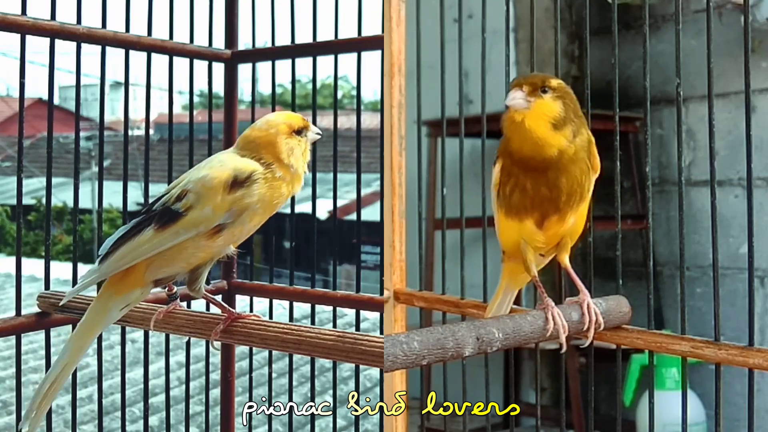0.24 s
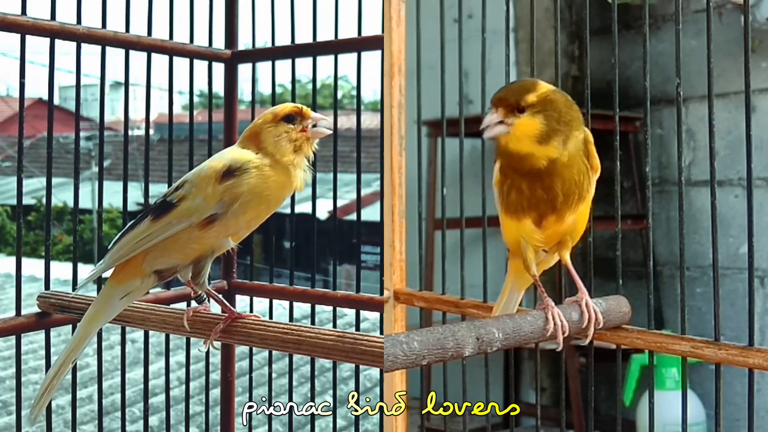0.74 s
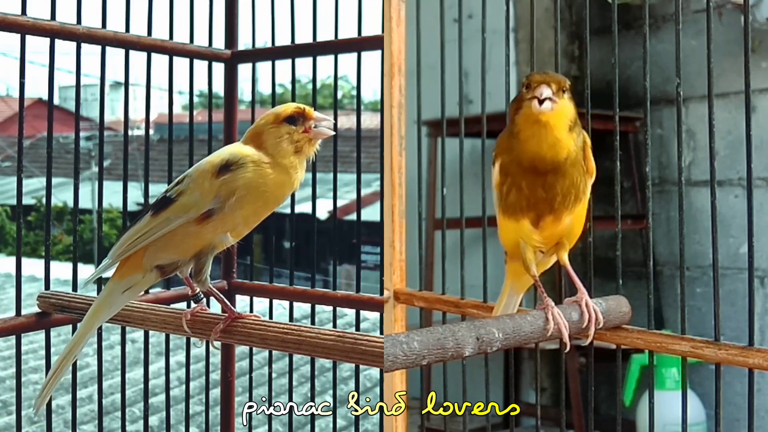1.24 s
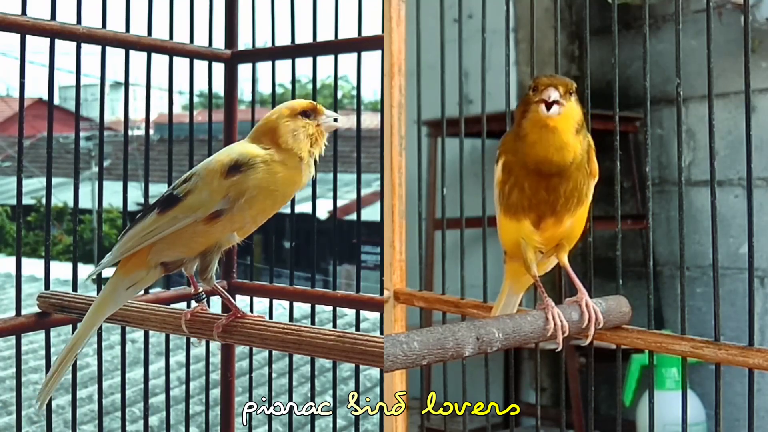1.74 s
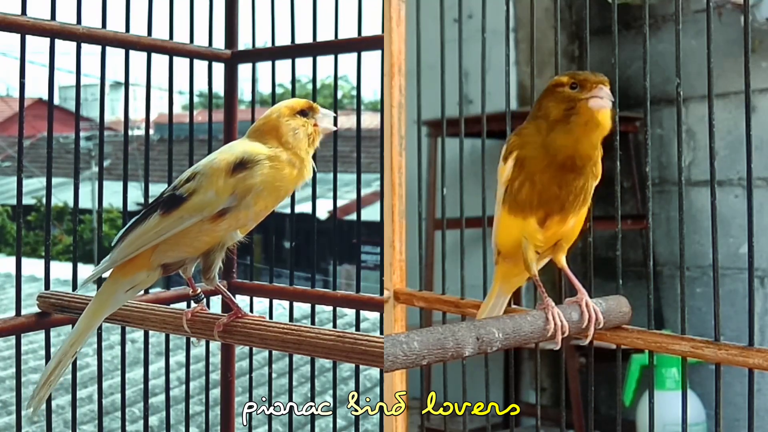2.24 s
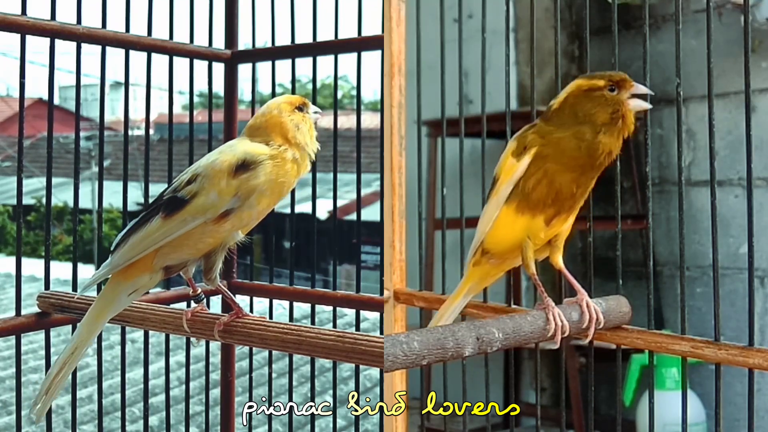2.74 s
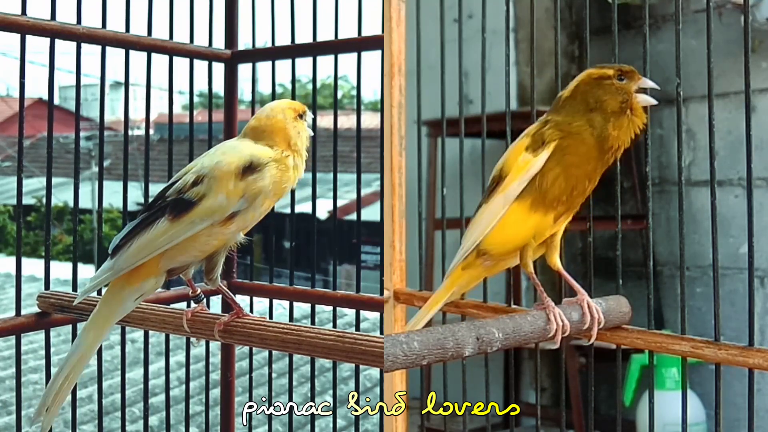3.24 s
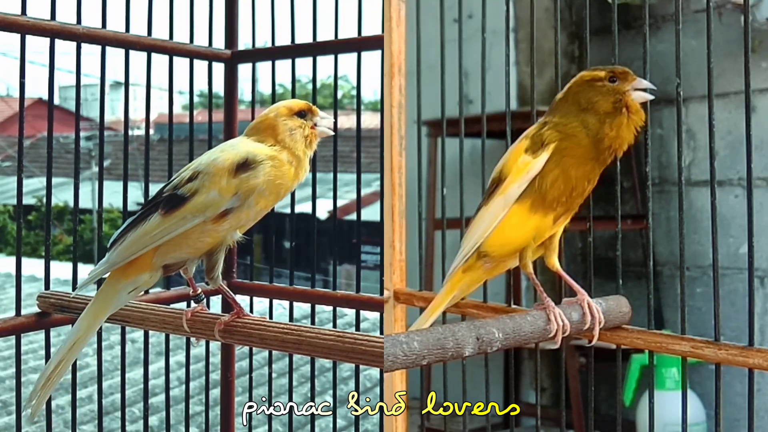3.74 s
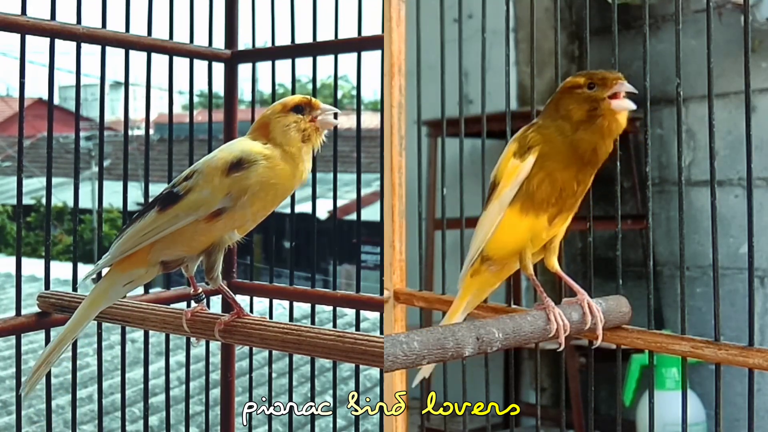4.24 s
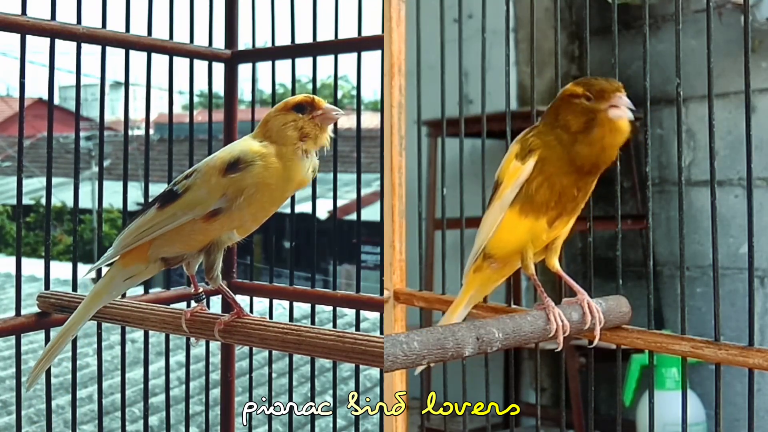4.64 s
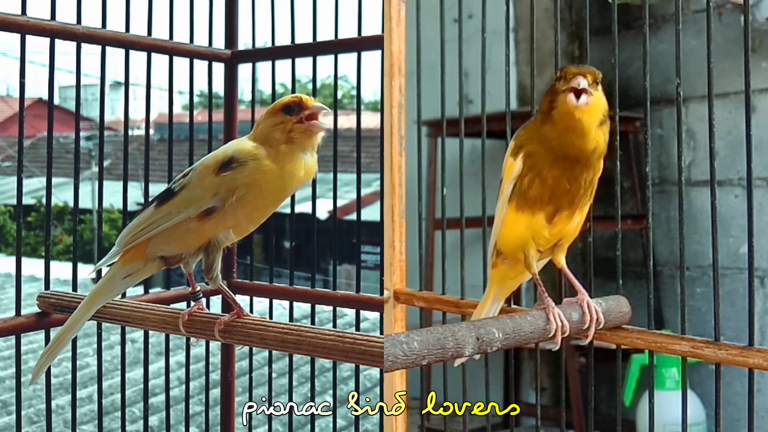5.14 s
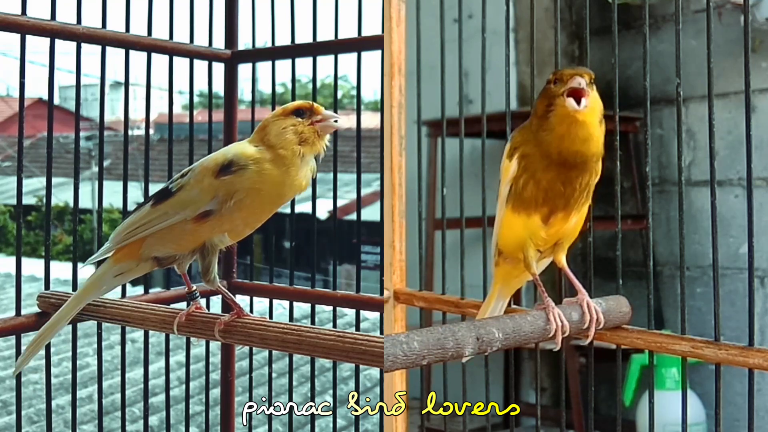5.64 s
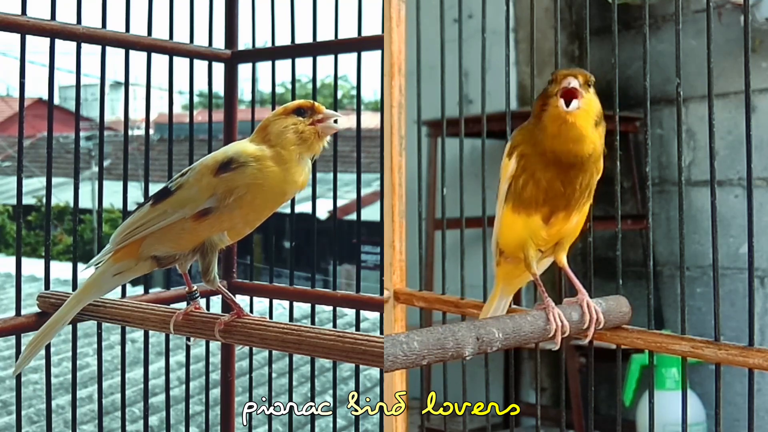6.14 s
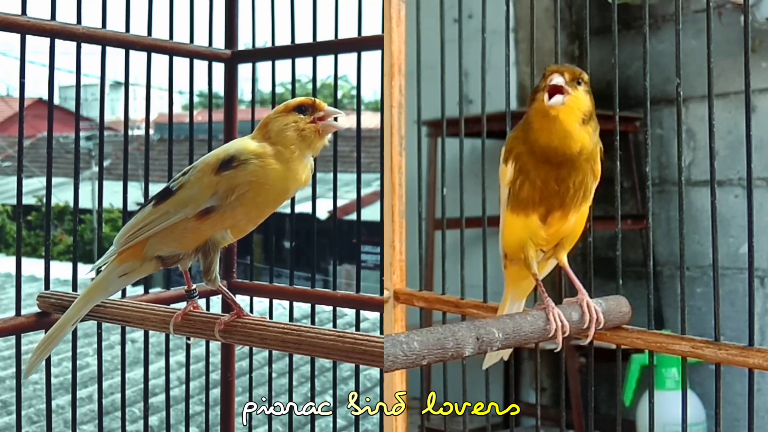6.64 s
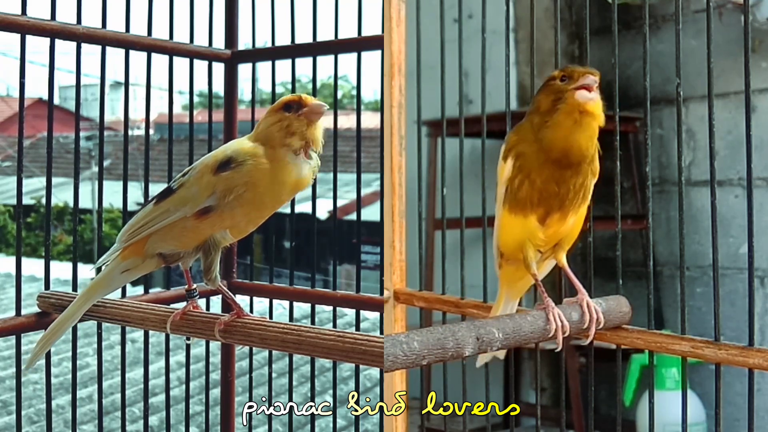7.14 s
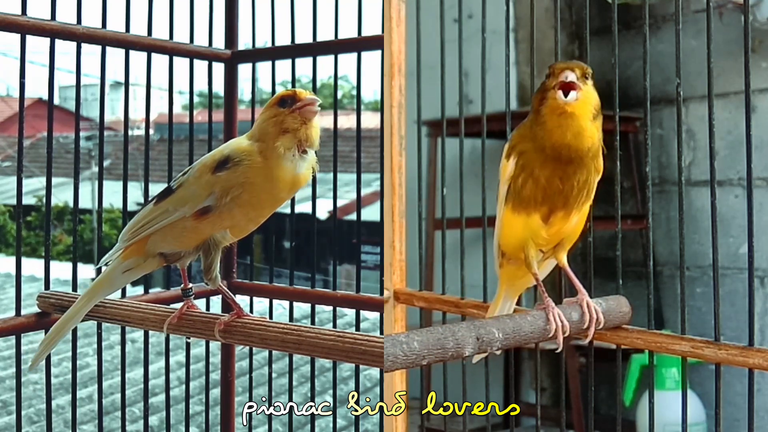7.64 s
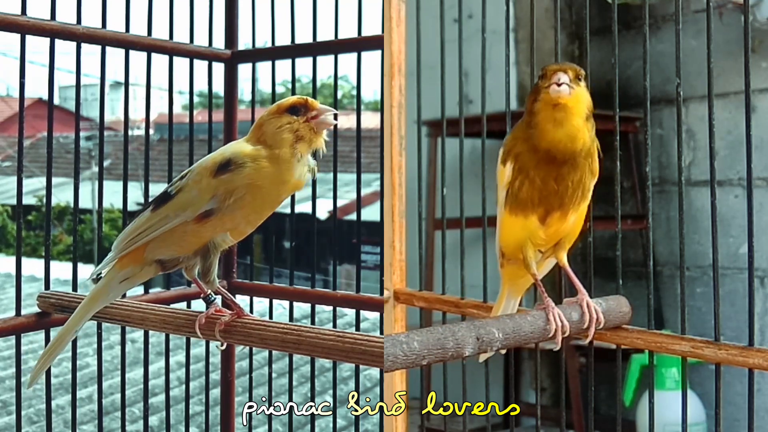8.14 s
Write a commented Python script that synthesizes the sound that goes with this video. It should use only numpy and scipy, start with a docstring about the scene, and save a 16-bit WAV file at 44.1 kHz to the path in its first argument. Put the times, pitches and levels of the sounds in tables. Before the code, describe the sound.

Bright, piercing duet of two canaries, quick ticks, swooping whistles and buzzy trills, with low wind buffeting and a faint distant engine.

```python
"""A roof terrace: two caged canaries sing against each other, repeating whistled sweeps, held notes and trills.
Each bird is a near sine steered by pitch and level tracks, with faint overtones and breath hiss.
Near walls blur the song in a short noise tail and a far wall returns the second bird late. Wind buffets the
microphone as lumpy low noise, a small engine drones far off as two wavering sines, soft distant knocks are
low noise bursts, and filtered noise makes the outdoor hum."""
import sys
import numpy as np
from scipy import signal
from scipy.fft import rfft, irfft
from scipy.io import wavfile
from scipy.ndimage import uniform_filter1d

SR = 44100
rng = np.random.default_rng(int(sys.argv[2]) if len(sys.argv) > 2 else 0)


def unload_audio(sound):
    """Save the sound as a 16-bit wav file, at the path given as the first command line argument."""
    columns = np.transpose(np.atleast_2d(sound))
    # keep every value between -1 and 1, then stretch to whole-number steps
    steps = np.round(np.clip(columns, -1, 1) * 32767)
    wavfile.write(sys.argv[1], SR, steps.astype(np.int16))


N = 369999

# All levels are mix levels, ahead of the output gain in record().
# Opening glides shared by the arched syllables of the first bird: flick up, steep fall, break
# [length/ms, start f/Hz, end f/Hz, bend, onset level/dB, body level/dB, ending level/dB]
ARCH_TOP = [(11.17, 5400, 7650, 4.0, -16, 2, 10.5), (19.3, None, 7200, .6, 4, 4.5, 3),
            (54.9, None, 4400, 1.35, 2.5, 1.5, 1.5), (25.7, 4200, 3800, .8, 2, -1.5, 1)]
# Song: each syllable has a chain of glides and the phrases that use it.
# Glides: [length/ms, start f/Hz, end f/Hz, bend, onset level/dB, body level/dB, ending level/dB]
# Phrases: [t/s, length/s, level/dB before throat colour]; a count spreads that many notes through the rows.
FIRST_SYLLABLES = { "fall": ([(10.5, 7800, 7500, 0.6, 3, 6.2, 3.5), (15, None, 6000, 1.1, 11.6, 0.57, 0.36),
                   (None, None, 1900, 0.82, 0.48, 3, 1)], [dict(count=13, notes=[(.4677, 0.072, -22),
                   (.7719, 0.074, -22), (1.0781, 0.07, -22.5), (1.3878, .0804, -21.5),
                   (1.7099, 0.07, -24)])]), "hooked tick": ([(5, 2798.5, 3351, 1.5, -3, 13, -5),
                   (None, 3050, 1300, 1.1, 0, 0, -31)], [dict(count=9, notes=[(.198, .015, -33),
                   (.372, .015, -29)])]), "quick fall": ([(6, 7799, 7398.5, 1.07, 25, 1, 1),
                   (23, None, 4400, 0.95, -12.5, 1, -1.9), (None, None, 2100, 0.88, 0, 1.53, -11.5)],
                   [dict(notes=[(.383, 0.059, -21)]), dict(count=17, notes=[(1.7985, 0.047, -20),
                   (2.0955, 0.05, -19.5), (2.4023, 0.056, -20.5), (2.7252, .0506, -19.5),
                   (3.0411, 0.057, -20)])]), "long fall": ([(10, 7700, 7550, 1.5, 7, -3.5, 0),
                   (None, None, 2200, .6, -1.6, 0.4, -7)], [dict(notes=[(3.274, .183, -17),
                   (3.489, 0.187, -17), (3.709, 0.2, -16.5), (3.9405, 0.146, -17.5)])]),
                   "straight fall": ([(None, 7700, 2300, .76, 2, 0.4, -7)],
                   [dict(notes=[(3.1205, 0.12, -16.5), (5.221, 0.14, -17)])]),
                   "bent fall": ([(7.5, 7401, 7309, 0, 2, -0.5, -11),
                   (50, None, 4900, 1.3, -7.5, -1.5, -3.3), (None, None, 2100, 0.83, 0, 3.6, -15.5)],
                   [dict(count=6, notes=[(4.1225, .13, -21.5), (4.9135, 0.13, -19)]),
                   dict(notes=[(5.0635, .135, -19.5)])]),
                   "fall and hold": ([(29, 7606, 7079, 0.76, -12, -2.5, 3),
                   (32, None, 6850, 0.79, 4, 3.5, 0), (104, None, 4100, 1.02, 1.5, -1, -1.1),
                   (None, None, 4020, 8.6, -.7, .2, .2)], [dict(notes=[(5.4025, .252, -16)])]),
                   "arch": (ARCH_TOP + [(None, None, 2520, 1.6, 2.5, 2.2, .6)],
                   [dict(notes=[(5.748, .19, -18.5), (5.977, 0.19, -18), (6.2115, 0.19, -20),
                   (7.5945, 0.19, -20.5), (7.8575, 0.1921, -18), (8.101, 0.206, -20),
                   (8.357, 0.18, -15.5)])]),
                   "long arch": (ARCH_TOP + [(None, None, 2150, 1.5, 1.5, -1.5, -8)],
                   [dict(notes=[(6.4515, 0.23, -17), (6.716, 0.24, -17.5), (7.015, 0.24, -16.5),
                   (7.309, 0.24, -17.5)])]), }
SECOND_SYLLABLES = { "tick": ([(7, 7100.5, 5500, 1.5, -18, -8.5, -19),
                    (5.02, None, 3900, 1.1, -15, -1.1, 4.6), (None, None, 3300, 0.98, -2, -12.5, -10)],
                    [dict(count=10, notes=[(.0145, .017, -14.5), (.1565, .017, -14),
                    (.304, .017, -16.5)])]), "flick": ([(13, 7299, 5000, 1.8, -15, -11, 12),
                    (None, 4400, 2850, 1.1, -22, -4.5, -11.5)], [dict(count=9, notes=[(.4287, 0.025, -8),
                    (.6319, 0.029, -7), (.8344, .028, -6.5)])]),
                    "deep flick": ([(25, 6949.5, 4198, 1.46, 13, -2.5, -12),
                    (None, 3600, 1630, .9, 0, 1.43, 3)], [dict(count=11, notes=[(4.1633, 0.045, -16.5),
                    (4.4814, 0.045, -15.5), (4.8113, .0412, -15.5)])]),
                    "plunge": ([(53, 6900, 4450, 1.35, -6, 4.2, 0), (None, 4250, 1400, .85, 1.6, 7.9, 1.9)],
                    [dict(count=10, notes=[(.885, 0.082, -20), (1.19, 0.077, -19.5), (1.491, .08, -19.5),
                    (1.799, 0.081, -19)])]), "fall": ([(58, 6800, 3750, 1.3, 0.83, 1.23, 1.5),
                    (None, 3450, 1300, .6, 1.7, 7.6, 9.2)], [dict(count=6, notes=[(1.91, .094, -17.5),
                    (2.49, 0.092, -17)]), dict(count=5, notes=[(4.8762, 0.098, -17.5),
                    (5.3522, 0.093, -16.5)])]), "stepped fall": ([(51.5, 6900, 5900, 1.35, 5.5, -0.5, -1.5),
                    (19, None, 5550, 0.94, -0.5, -1.1, 0), (None, 5150, 1100, 0.42, 6.4, 1.5, 3)],
                    [dict(notes=[(5.474, .143, -17)]), dict(count=4, notes=[(5.65, 0.14, -15),
                    (6.171, .143, -16)])]), "high note": ([(5, 4302, 5500.5, 1.5, -18, -8, -7),
                    (None, None, 5650, 3.01, -1.2, -10, -13)], [dict(notes=[(2.796, 0.0559, -9.5),
                    (3.031, .063, -12)])]), "pip": ([(None, 4500, 5900, 7.04, -3, 0, -13)],
                    [dict(notes=[(2.608, 0.026, -14)])]),
                    "low note": ([(None, 2701, 2660, 1.094, -3.5, 0, -22)], [dict(notes=[(2.643, 0.13, -9),
                    (2.858, 0.14, -7.5), (3.093, 0.162, -9)])]),
                    "rise": ([(26, 2052.5, 3951, 2.3, -30, 6, 2), (7, None, 4950, 1.5, 0.55, -12, -6),
                    (47, None, 6800, .75, -1.5, 0, 0), (None, 7000, 7100, 0.98, -15, -16, -22)],
                    [dict(notes=[(6.511, 0.095, -15), (6.624, 0.093, -14.5)]),
                    dict(count=6, notes=[(6.735, .09, -16), (7.260, .09, -15.5)])]),
                    "scoop": ([(None, 1300, 3261, 2.1, -20, .6, -2.8)], [dict(notes=[(7.578, .06, -12),
                    (7.838, .06, -12.5)])]), "flip": ([(None, 1500, 3500, 7.4, -20.5, 1.5, -9)],
                    [dict(notes=[(7.363, .035, -11)])]), "held note": ([(36, 3998, 4569, 1, -4, 0.5, -14),
                    (None, None, 4670, 2.1, -.6, -0.26, -.2)], [dict(notes=[(7.4, 0.143, -12.5),
                    (7.64, 0.148, -12), (7.9, .173, -11)])]),
                    "high held note": ([(21.5, 4012, 4201, 3, -14, 4, 5),
                    (None, 4600, 5600, 4.4, 5.4, -0.49, 1.6)], [dict(notes=[(6.347, .141, -16)])]),
                    "hook": ([(8.5, 5208, 6848, 2.5, -4, -8, 3), (81.5, None, 3400, 1.4, -8, -6, -2.2),
                    (None, 3150, 2380, 1.6, -9, -3, -2)], [dict(notes=[(8.1185, .17, -8),
                    (8.329, 0.18, -10)])]), }
# Trills of short sweeps, each with a note count and a bend: [t/s, length/s, start f/Hz, end f/Hz, level/dB]
FIRST_TRILLS = [dict(count=3, bend=0.92, notes=[(.141, 0.01, 2501, 1203, -41),
                (.183, .011, 2697, 1299, -37)])]
SECOND_TRILLS = [ dict(count=9, bend=0.83, notes=[(3.272, 0.006, 3300, 2350, -14),
                 (3.340, 0.006, 5300, 2950, -12.5), (3.415, 0.0062, 5900, 3200, -14)]),
                 dict(count=15, bend=0.93, notes=[(3.434, 0.007, 6850, 4500, -13),
                 (3.5715, 0.0066, 6800, 4500, -13), (3.713, 0.0064, 6850, 4500, -13)]),
                 dict(count=15, bend=2.5, notes=[(3.768, 0.02, 2000, 4050, -17),
                 (3.927, 0.018, 2050, 4150, -16), (4.090, 0.02, 2114, 4200, -18)]),
                 dict(count=1, bend=2.9, notes=[(3.741, 0.022, 2300, 3850, -10.5)]), ]
# How strongly throat, beak and perch position pass each pitch: [f/Hz, level/dB]
FIRST_THROAT = [(2300, 0.5), (2650, 5.5), (3250, 4.5), (3650, 4.5), (4150, 11), (4450, 8), (4650, -0.5),
                (4950, 11), (5250, -5), (5600, 10.5), (5800, 0.5), (6150, 10.5), (6800, -4), (7100, 7.5),
                (7700, -13)]
SECOND_THROAT = [(1700, -12.5), (2000, -24.5), (2400, -4.5), (2700, -9), (3200, 5.5), (3550, -1),
                 (3850, 5.5), (4150, 5), (4550, 2), (4800, 8), (5100, 2), (5600, 8.5), (5900, 4.5),
                 (6250, 7.5), (6700, -6), (7100, 19)]
# Overtones of the whistle, at the reference loudness: [multiple of the pitch, level/dB]
OVERTONES = [(2, -38), (3, -37.5)]
# Extra lift of the overtones by their own pitch: [f/Hz, level/dB]
OVERTONE_LIFT = [(6500, 3.5), (8300, -2.5), (10500, 2), (12500, -8), (15200, 13.5)]
# Space round each cage: [t60/s, near-wall level/dB, far-wall level/dB]
FIRST_SPACE = (0.17, -14.5, -79.5)
SECOND_SPACE = (0.35, -14.5, -33)
# Gusts, before the lumps and the upper rumble: [t/s, level/dB]
WIND = [(0.0, -56), (0.08, -24.5), (0.19, -34.5), (0.38, -36.5), (0.44, -50), (0.71, -39), (0.84, -29),
        (0.91, -34), (0.95, -25), (1.08, -25), (1.13, -34), (1.27, -28), (1.47, -38.5), (1.7, -49),
        (1.98, -32), (2.6, -64)]
# Distant engine, before the waver: [t/s, firing rate f/Hz, fifth order level/dB, sixth order level/dB]
ENGINE = [(.3, 37.09, -40.5, -53), (1.899, 38.76, -54, -46), (2.4, 35.89, -42.5, -45.5),
          (2.95, 36.3, -37.5, -49), (3.25, 36.8, -42, -44), (3.75, 34.5, -42, -42),
          (3.999, 32.0, -41.5, -45), (4.55, 29.9, -44, -42.5), (5.501, 29.04, -72, -66.5),
          (5.751, 33.36, -50.5, -51.5), (6.301, 33.23, -51, -54.5)]
# Far knocks, each trimmed by 3 dB and swelling to its peak 30 ms after t: [t/s, level/dB]
KNOCKS = [(3.09, -49), (3.527, -52.5), (3.979, -47.5), (4.447, -47), (4.917, -47.5), (5.372, -51.5)]
# Colour of the outdoor hum, only its shape counts: [f/Hz, level/dB per Hz]
HUM_COLOUR = [(30, -43), (90, -2.5), (167, -3), (225, -7.5), (544, -23.5), (1500, -30.5), (1950, -30),
              (3300, -120)]
# Fader of the outdoor background, hum and whir together: [t/s, level/dB]
TOWN_LEVEL = [(0.0, -60.5), (1.68, -57.5), (4.6, -62), (5.6, -66.5), (6.8, -67), (7.3, -66.5),
              (8.39, -64.5)]

ACCENT_SHARPNESS = 5.13             # how closely onset and ending levels keep to the ends of a glide
BREAK_S, BREAK_DB = 0.0026, -16     # the voice nearly stops at a break
LOUD_DB = -8.0                      # whistle level at which the overtones are as listed
OVERTONE_GROWTH = 0.9               # extra dB per dB of whistle, times (multiple - 1)
HASTE_HZ_PER_S = 90000              # glides this fast hiss fully
HEAD_TURN = 0.011                   # moving heads shift the best-passed pitches by this share, rms
FAR_WALL_S = 0.35
OVERLOAD_AT = 5.2                   # pressure at which the microphone would flatten out
CUTOFF_HZ = 15950


def bird(syllables, trills, throat):
    """One whistle at a time: a near sine on the pitch track, with faint patchy overtones and breath hiss."""
    pitch, level = song_tracks(syllables, trills)
    hz = pitch * (1 + 0.004 * noise_band(12, 70))       # the pitch wavers
    phase = 2 * np.pi * np.cumsum(hz) / SR
    flutter = from_db(1.3 * noise_band(50, 220))
    heard_hz = hz * (1 + HEAD_TURN * noise_band(0.95, 5.6))
    passed = from_db(at_hz(throat, heard_hz))
    tone = flutter * passed * np.sin(phase)
    tone += overtones(hz, phase, passed, level)
    high_notes_push_more_air = (hz / 5000) ** 0.59
    return level * (tone + breath(pitch) * high_notes_push_more_air)


def song_tracks(syllables, trills):
    """Lays all notes of one bird on a pitch track (Hz) and a level track (gain), each level slightly random."""
    track = np.array([np.full(N, 3000.), np.zeros(N)])
    for glides, phrases in syllables.values():
        for phrase in phrases:
            notes = phrase["notes"]
            for start, length, level_db in spread(notes, phrase.get("count", len(notes))):
                add_note(track, start, length, syllable_shape(glides, length), level_db + rng.normal(0, 1.0))
    for trill in trills:
        for start, length, start_hz, end_hz, level_db in spread(trill["notes"], trill["count"]):
            shape = trill_shape(start_hz, end_hz, trill["bend"])
            add_note(track, start, length, shape, level_db + rng.normal(0, 1.2))
    return track


def overtones(hz, phase, passed, level):
    """Multiples of the whistle that fade faster than it does and come and go in patches."""
    loudness = passed * level / from_db(LOUD_DB)
    total = np.zeros(N)
    for k, level_db in OVERTONES:
        patchy_db = 2.5 * noise_band(6.0, 110)
        gain = from_db(level_db + patchy_db + at_hz(OVERTONE_LIFT, k * hz))
        growth = loudness ** (OVERTONE_GROWTH * (k - 1))
        below_limit = k * hz < .45 * SR      # keeps overtones from folding back
        total += passed * growth * gain * below_limit * np.sin(k * phase)
    return total


def breath(pitch):
    """Air noise: a constant top band, plus a lower band because fast glides are breathier."""
    hiss = from_db(-38.5) * noise_band(14200, 15800)
    haste = np.clip(np.abs(np.gradient(pitch)) * SR / HASTE_HZ_PER_S, 0, 1)
    return hiss + haste * from_db(-40) * noise_band(9300, 14200)


def syllable_shape(glides, length):
    """Chains glides into rows (share of length, pitch Hz, level dB), with level dips where the voice breaks."""
    u = np.linspace(0, 1, num=40)
    rows, breaks = [], []
    begin, last_hz = 0, None
    for part_ms, start, end, bend, onset_db, body_db, ending_db in glides:
        part_s = length - begin if part_ms is None else part_ms / 1000
        if start and begin:
            breaks.append(begin)
        start_hz = start or last_hz
        hz = start_hz + (end - start_hz) * (1 - (1 - u) ** bend)
        onset_accent = (onset_db - body_db) * (1 - u) ** ACCENT_SHARPNESS
        ending_accent = (ending_db - body_db) * u ** ACCENT_SHARPNESS
        rows += zip(begin + part_s * u, hz, body_db + onset_accent + ending_accent)
        begin, last_hz = begin + part_s, end
    t, hz, db = np.transpose(rows)
    db = db + sum(BREAK_DB * np.exp(-((t - s) / BREAK_S) ** 2) for s in breaks)
    return np.transpose([t / length, hz, db])


def trill_shape(start_hz, end_hz, bend):
    """One short bent sweep, swelling to its loudest part-way through the glide."""
    u = np.linspace(0, 1, num=9)
    glide = 1 - (1 - u) ** bend
    swell_db = -7 * (2 * glide ** bend - 1.45) ** 2
    return np.transpose([u, start_hz + (end_hz - start_hz) * glide, swell_db])


def add_note(track, start, length, shape, level_db):
    """Writes one note into the tracks: muscles round its corners, the syrinx starts and stops within a few ms."""
    share, hz, db = np.transpose(shape)
    first, n = round(start * SR), round(length * SR)
    u = np.arange(min(n, N - first)) / n
    edge = np.clip(np.minimum(u, 1 - u) * length / 0.0029, 0, 1)     # 2.9 ms fades
    fade = np.sin(edge * np.pi / 2) ** 2
    smooth_hz = uniform_filter1d(np.interp(u, share, hz), size=89, mode="nearest")
    smooth_db = uniform_filter1d(np.interp(u, share, db), size=133, mode="nearest")
    track[0, first:first + n] = smooth_hz
    track[1, first:first + n] = from_db(level_db + smooth_db) * fade


def spread(rows, count):
    """A phrase of notes spaced evenly along the given rows, every column gliding from row to row."""
    place = np.linspace(0, len(rows) - 1, count)
    return np.transpose([np.interp(place, np.arange(len(rows)), c) for c in np.transpose(rows)])


def terrace(x, t60, near_db, far_db):
    """Direct sound, a dense dying tail from near walls, one smeared late echo from the far wall."""
    t = np.arange(SR // 2) / SR
    tail = noise_band(1300, 14500, len(t)) * from_db(-60 * t / t60) * (t > .003)
    late = noise_band(4000, 7000, len(t)) * np.exp(-((t - FAR_WALL_S) / 0.035) ** 2)
    near = from_db(near_db) * tail / np.linalg.norm(tail)
    far = from_db(far_db) * late / np.linalg.norm(late)
    return x + signal.fftconvolve(x, near + far)[:N]


def wind():
    """Lumpy pressure on the microphone port; the stronger the gust, the higher its rumble reaches."""
    level_db, = in_time(WIND)
    lumps = from_db(3.4 * noise_band(6, 22))
    low = band(noise_band(60, 150), 58, 400)
    upper = band(noise_band(120, 300), 90, 310)
    upper_gain = from_db(4.0 * (level_db + 25.5))     # rises 4 dB per dB of gust
    return from_db(level_db) * lumps * (low + upper_gain * upper)


def engine():
    """Only two orders of the firing rate carry this far; they waver on the way."""
    fade_in = [(0.002, ENGINE[0][1], -82, -68.5)]
    fade_out = [(6.8, ENGINE[-1][1], -96.5, -82)]
    rate, fifth_db, sixth_db = in_time(fade_in + list(ENGINE) + fade_out)
    phase = 2 * np.pi * np.cumsum(rate) / SR
    waver = from_db(2.5 + 1.5 * noise_band(2, 9))
    return waver * (from_db(fifth_db) * np.sin(5 * phase) + from_db(sixth_db) * np.sin(6 * phase))


def knocks():
    """Dull far blows, smeared into short bursts of low noise."""
    t = np.arange(N) / SR
    burst = sum(from_db(db - 3.0) * np.exp(-((t - s - .03) / 0.075) ** 2) for s, db in KNOCKS)
    return burst * noise_band(210, 820)


def town():
    """Outdoor hum of coloured noise, gently fluctuating, with a faint whirring band near 1.25 kHz."""
    hz = np.maximum(np.fft.rfftfreq(N, 1 / SR), 10)
    hum = irfft(rfft(rng.standard_normal(N)) * from_db(at_hz(HUM_COLOUR, hz)), N)
    whir = from_db(-2.0) * noise_band(1190, 1330)
    fluctuation = from_db(14.0 + 2.2 * noise_band(1.4, 7.4))
    level_db, = in_time(TOWN_LEVEL)
    return from_db(level_db) * (fluctuation * hum / np.std(hum) + whir)


def from_db(db):
    """Decibels to gain."""
    return 10 ** (np.asarray(db) / 20)


def in_time(rows):
    """Columns of a curve at every sample."""
    s, *columns = np.transpose(rows)
    return [np.interp(np.arange(N) / SR, s, c) for c in columns]


def at_hz(points, hz):
    """A spectrum read on a log-frequency axis."""
    point_hz, db = np.transpose(points)
    return np.interp(np.log(hz), np.log(point_hz), db)


def band(x, low_hz, high_hz):
    """Band-pass, rms 1."""
    y = signal.sosfilt(signal.butter(2, [low_hz, high_hz], "band", fs=SR, output="sos"), x)
    return y / np.sqrt(np.mean(y ** 2))


def noise_band(low_hz, high_hz, n=N):
    """Band of white noise, rms 1; the low bands serve as random movement."""
    return band(rng.standard_normal(n), low_hz, high_hz)


def scene():
    """Both birds in their spaces over the outdoor background."""
    first = terrace(bird(FIRST_SYLLABLES, FIRST_TRILLS, FIRST_THROAT), *FIRST_SPACE)
    second = terrace(bird(SECOND_SYLLABLES, SECOND_TRILLS, SECOND_THROAT), *SECOND_SPACE)
    # a near reflection cancels a narrow band of the second bird
    second = signal.lfilter(*signal.iirnotch(5150, 14, fs=SR), second)
    return (first + second + wind() + engine() + knocks() + town())[None]


def record(dry):
    """Slight overload mixes the two songs into faint treble lines; the top is cut."""
    overloaded = OVERLOAD_AT * np.tanh(dry / OVERLOAD_AT)
    top_cut = signal.cheby2(22, 60, CUTOFF_HZ, fs=SR, output="sos")
    return signal.sosfilt(top_cut, .74 * overloaded)      # .74 is the output gain


dry = scene()
out = record(dry)
unload_audio(out)
```